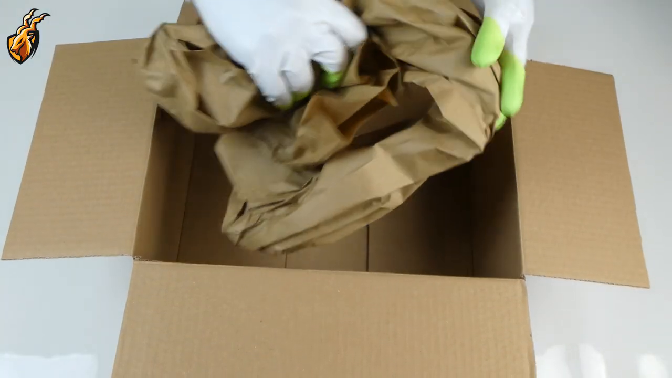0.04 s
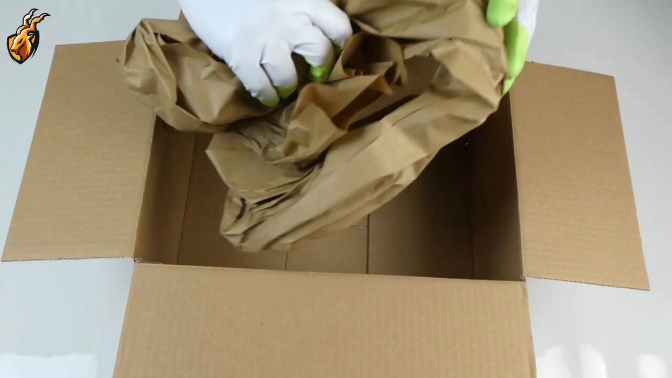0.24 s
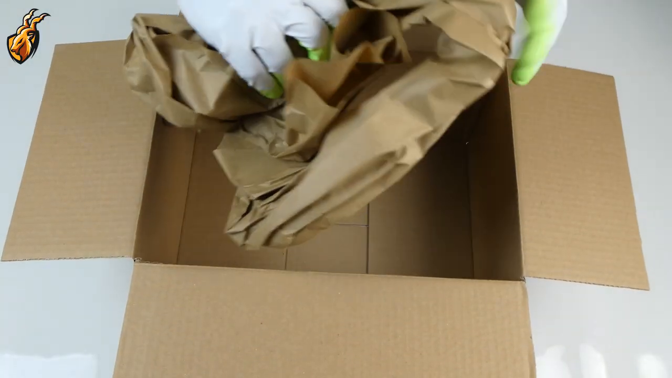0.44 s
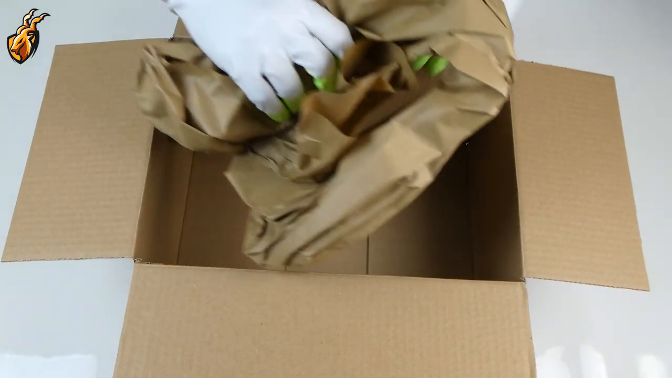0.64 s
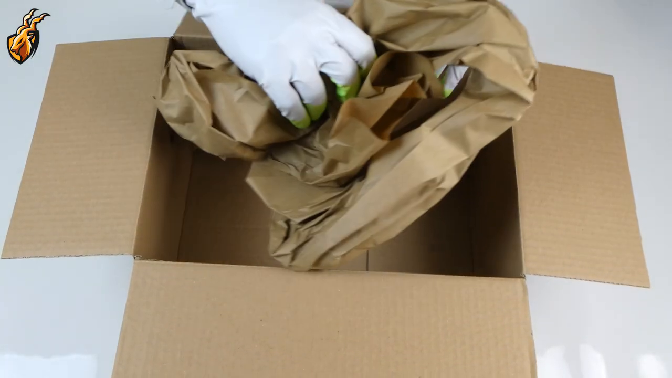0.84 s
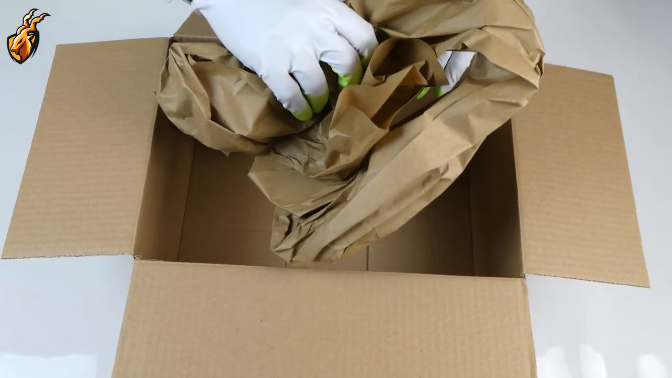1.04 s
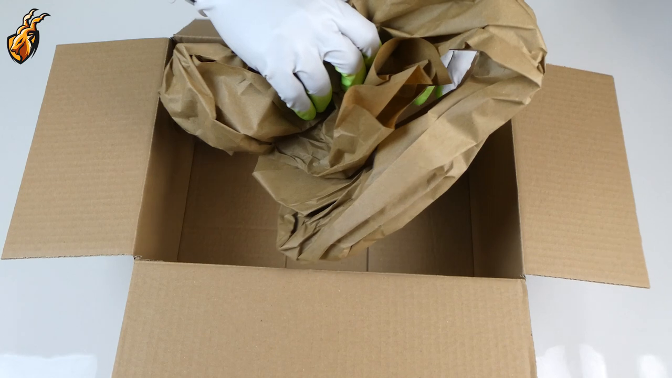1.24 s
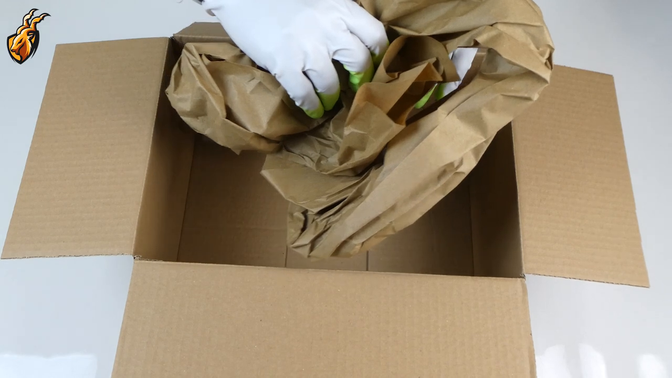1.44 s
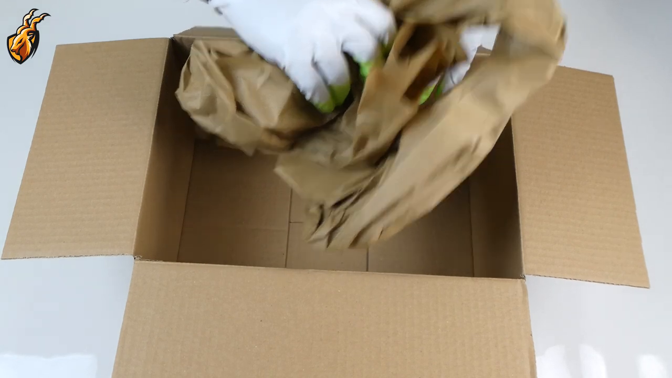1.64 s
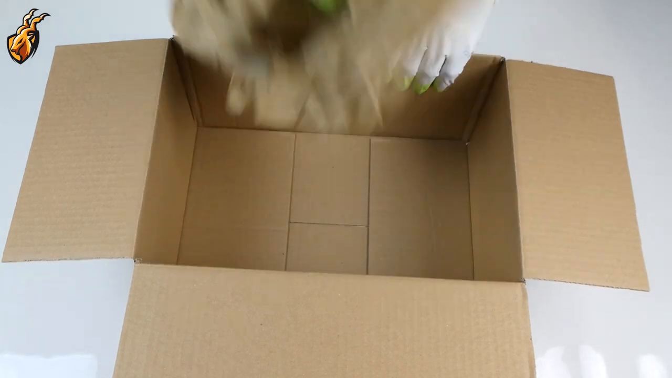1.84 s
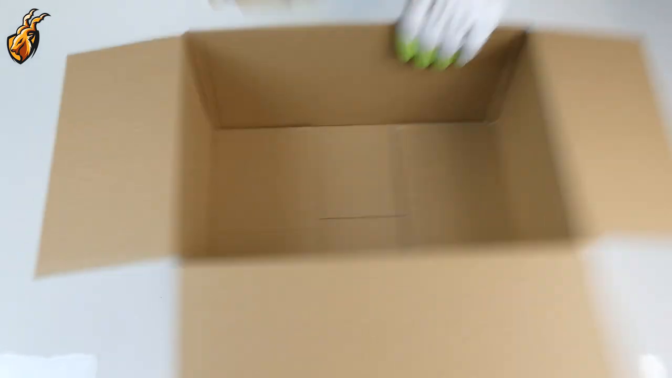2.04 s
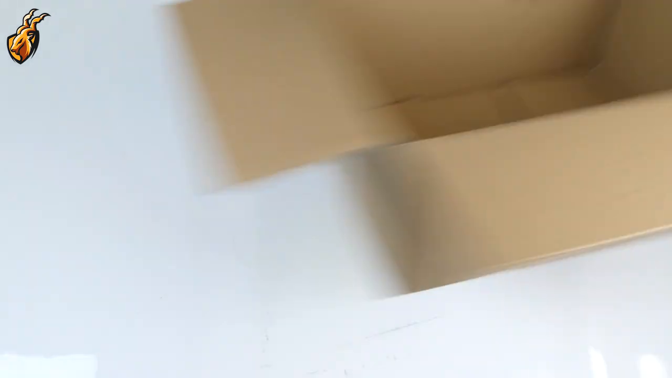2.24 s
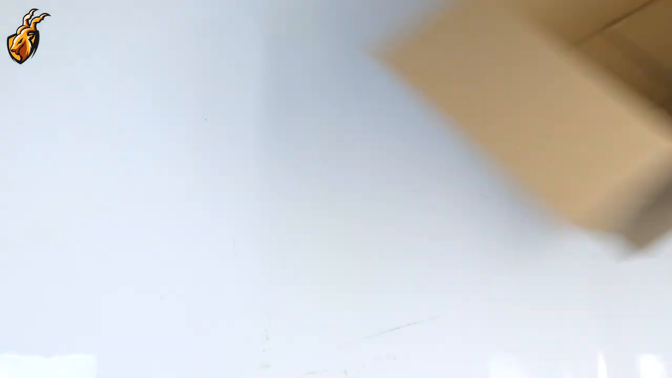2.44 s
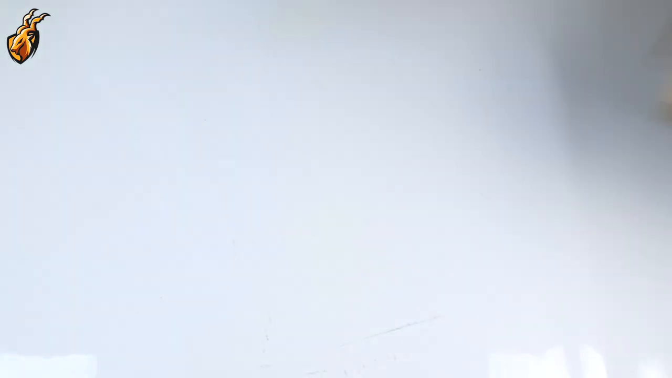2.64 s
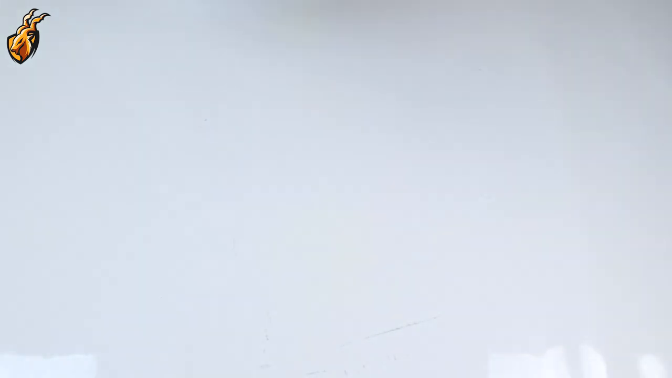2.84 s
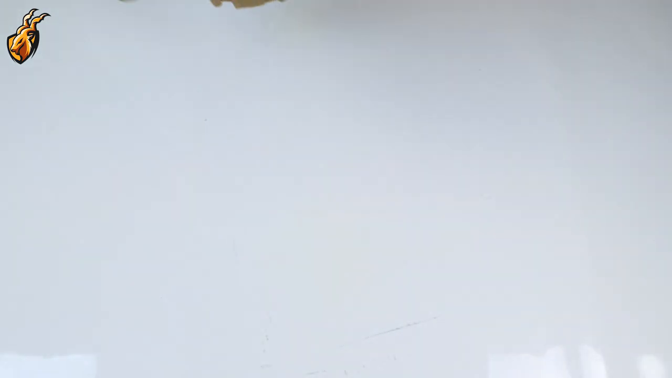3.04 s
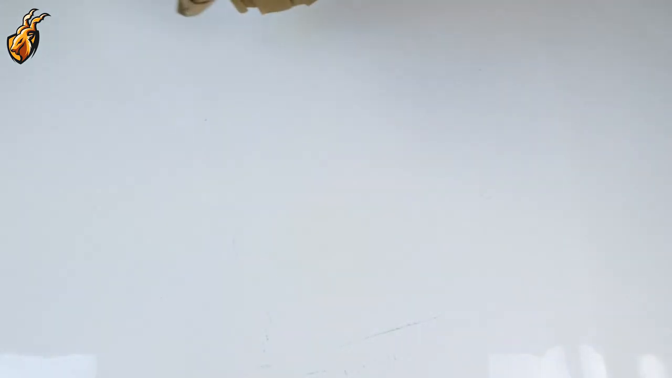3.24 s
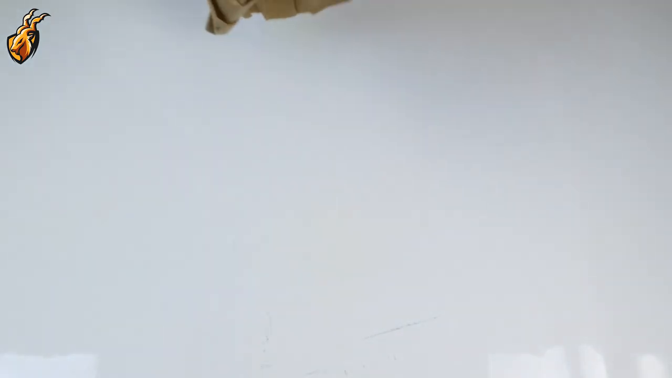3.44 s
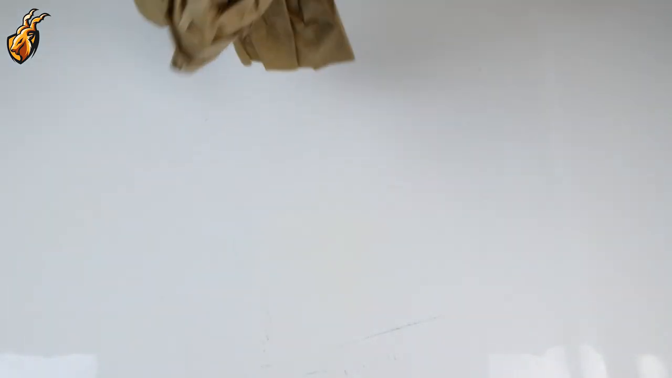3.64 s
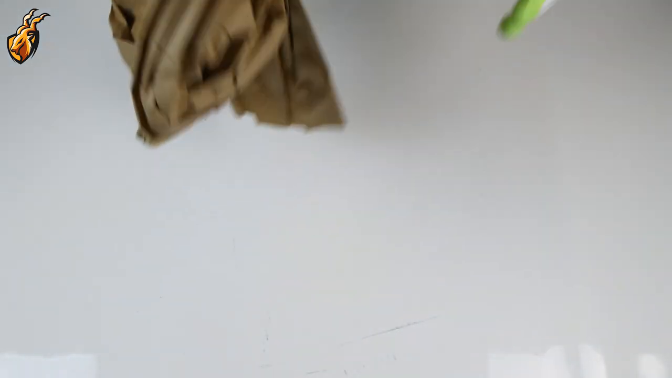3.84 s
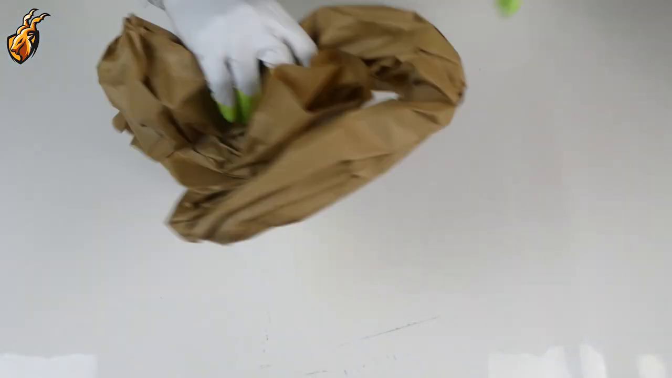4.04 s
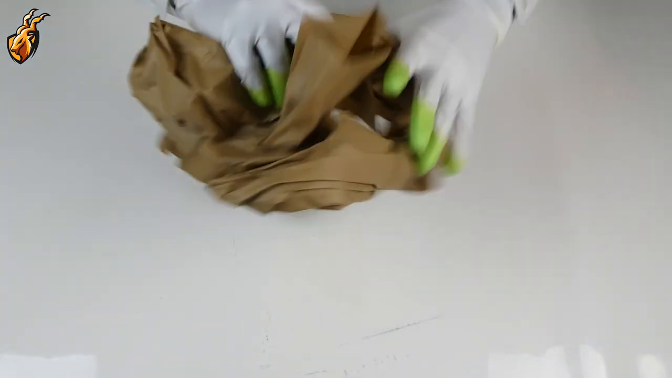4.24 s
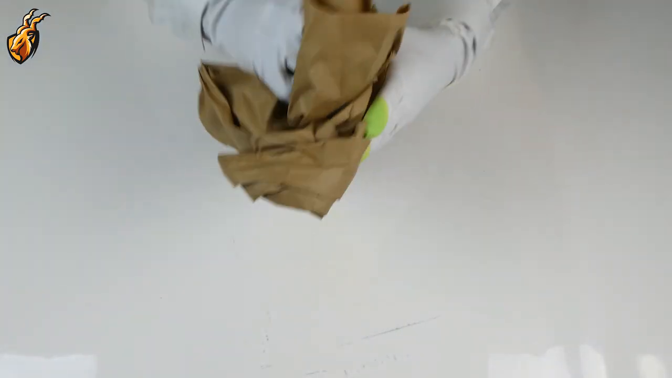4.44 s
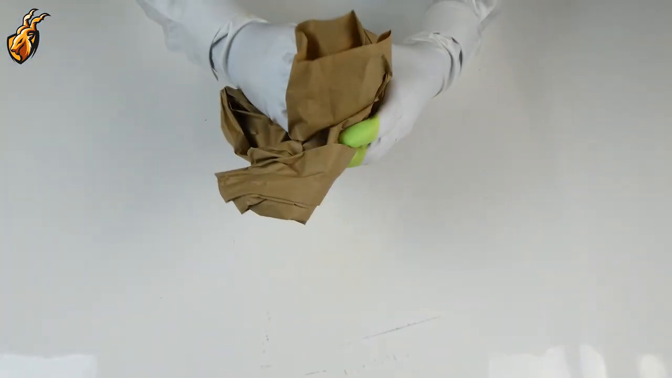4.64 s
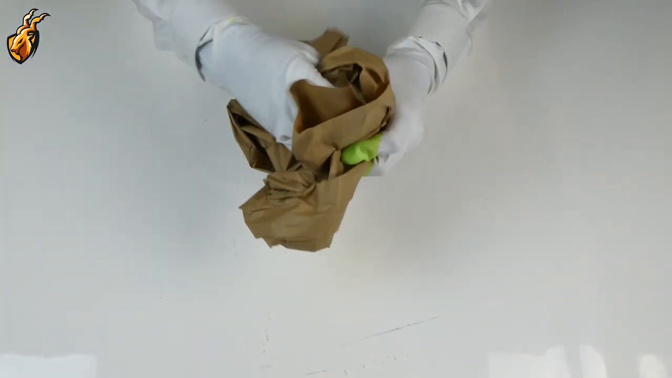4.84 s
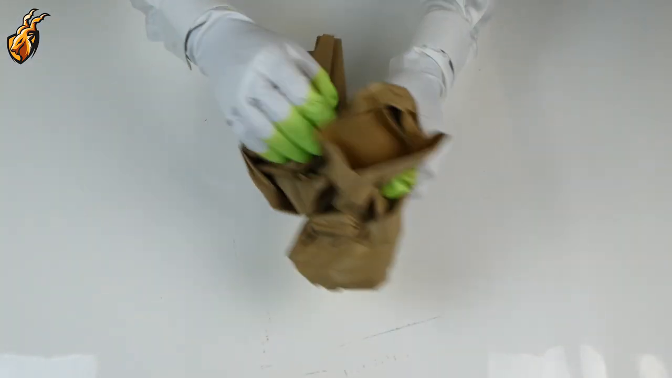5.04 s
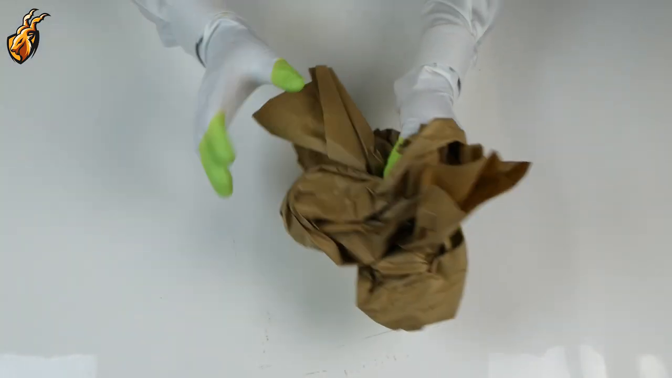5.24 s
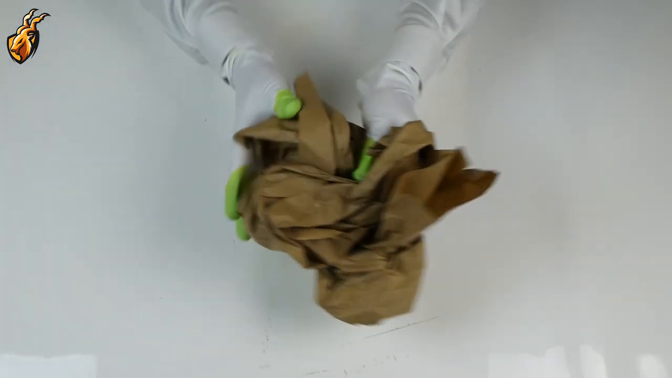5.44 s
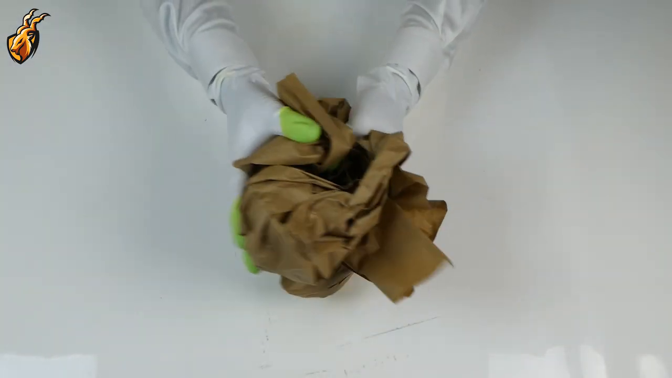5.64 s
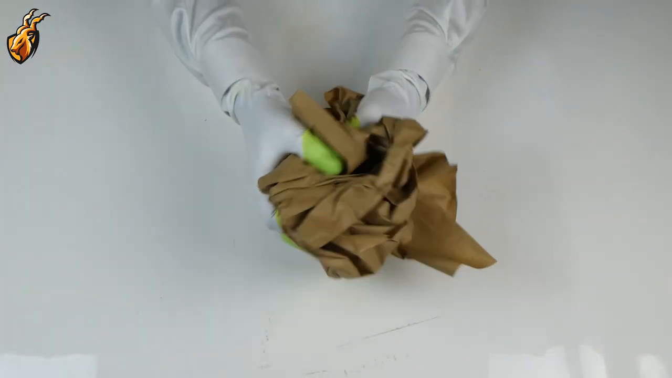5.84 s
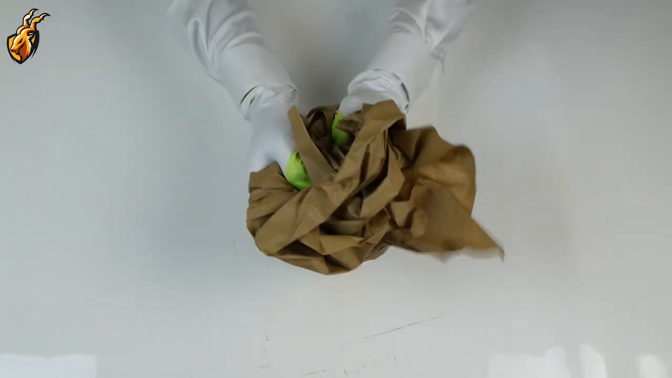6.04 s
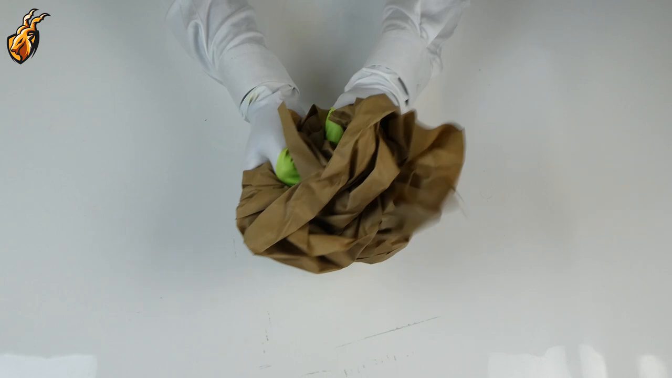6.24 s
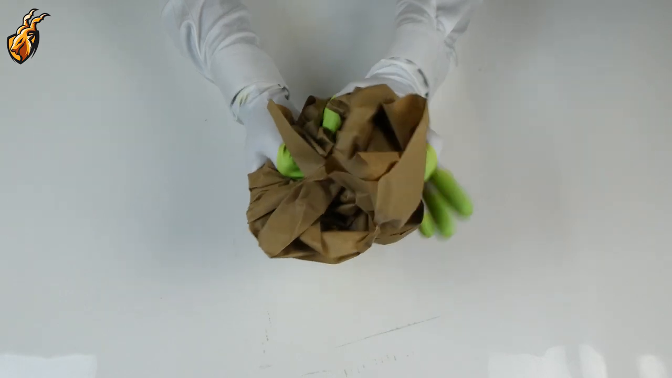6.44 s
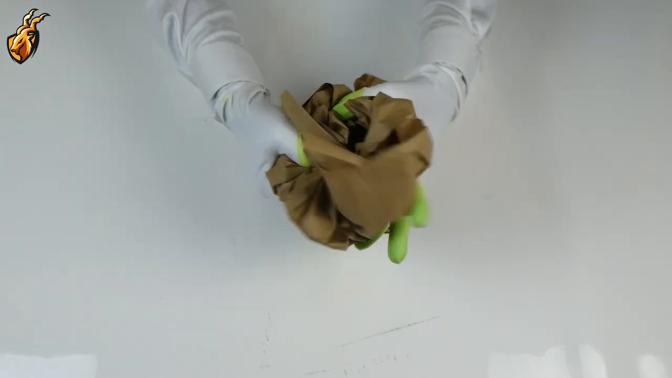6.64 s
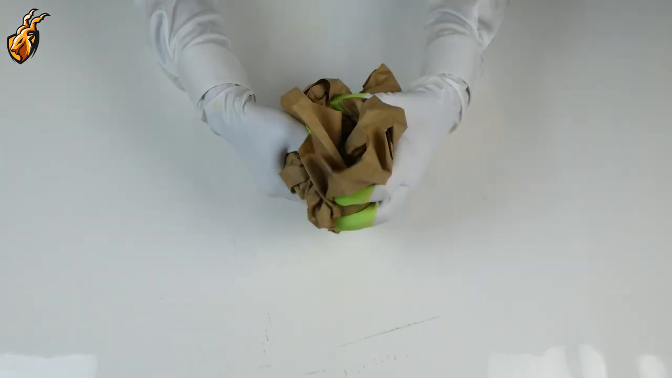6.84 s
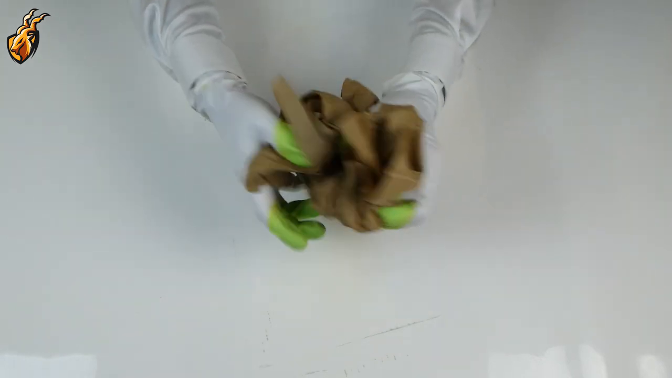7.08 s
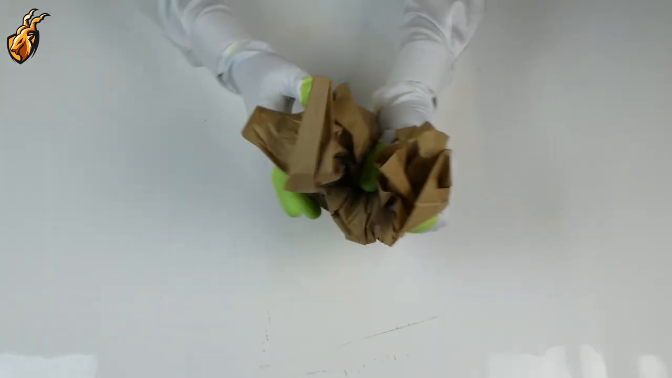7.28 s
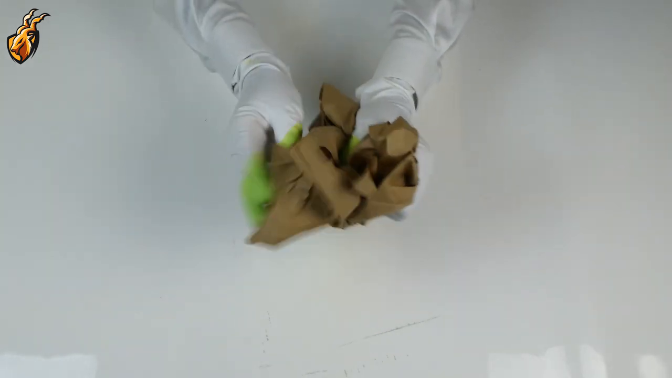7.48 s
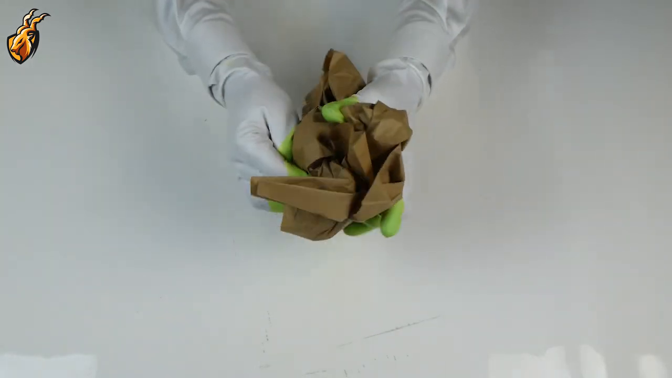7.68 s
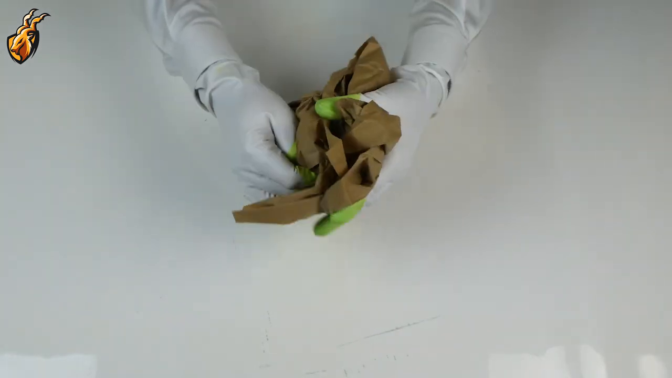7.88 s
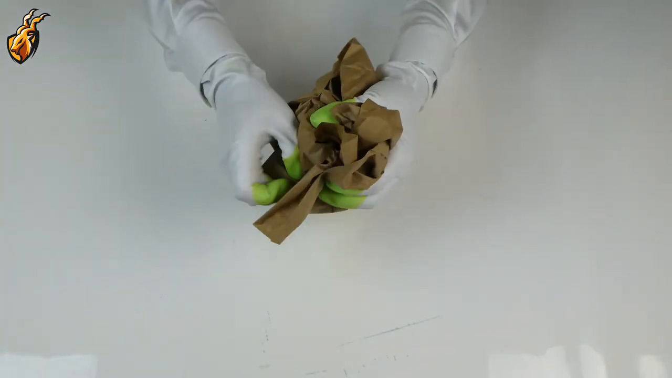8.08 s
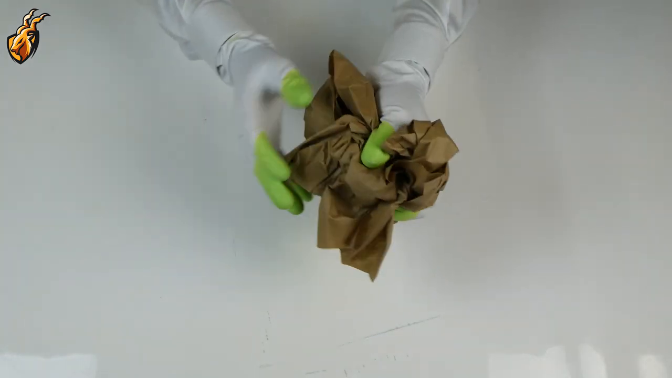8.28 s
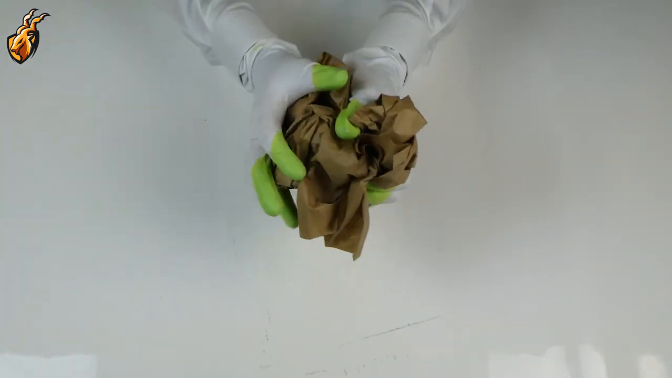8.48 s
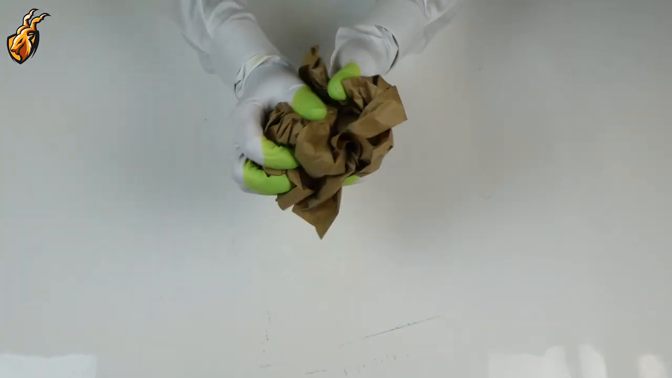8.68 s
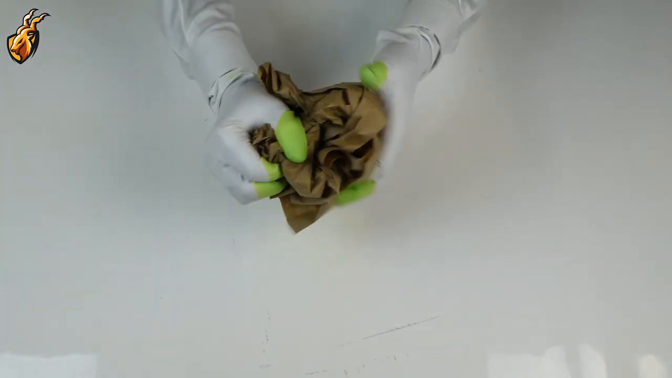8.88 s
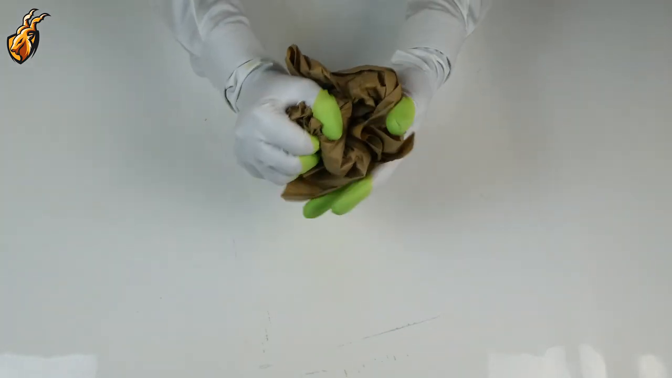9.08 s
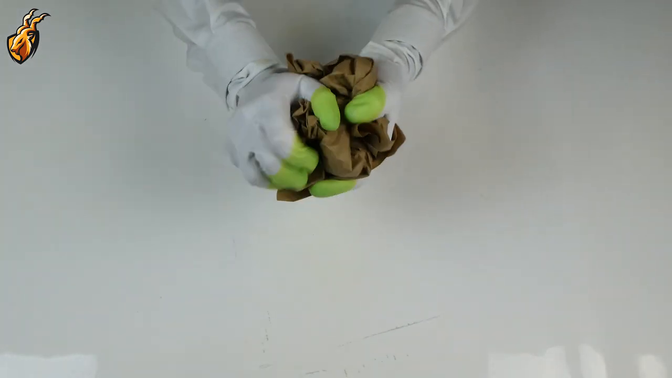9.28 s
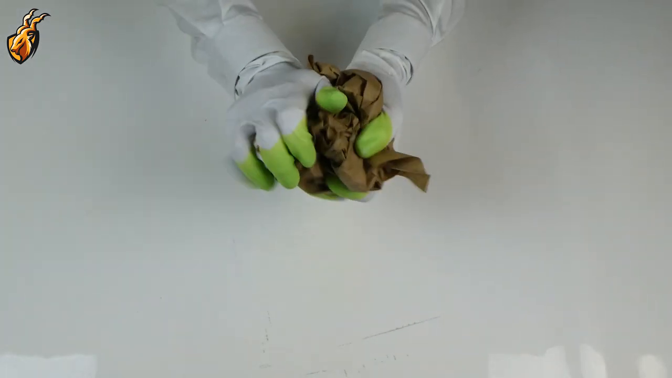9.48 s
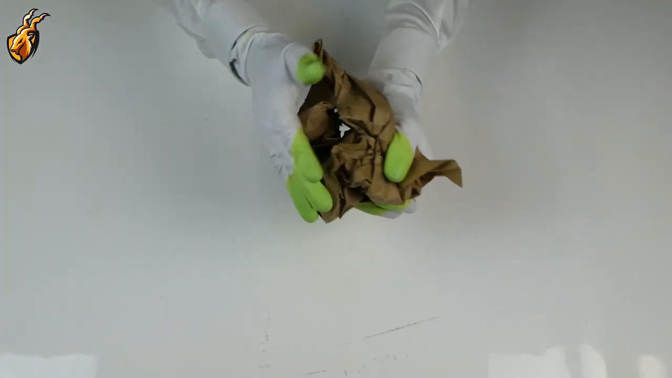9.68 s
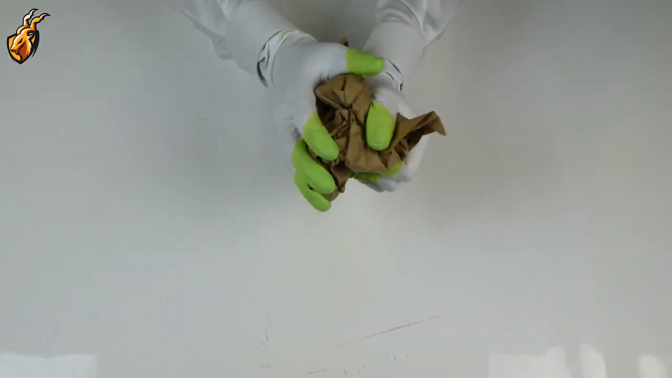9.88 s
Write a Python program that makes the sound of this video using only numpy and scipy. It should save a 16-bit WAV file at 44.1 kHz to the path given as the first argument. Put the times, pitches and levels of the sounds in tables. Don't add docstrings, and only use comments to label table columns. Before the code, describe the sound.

Close in a small quiet room, a stiff paper sheet slides out of a cardboard box with gritty rustles, small ticks and a hollow boxy ring. The box is moved away with faint bumps and near silence. Then gloved hands grab the sheet and crush it in rapid squeezes, loud crackles, sharp snaps and crunchy folds running to the end. A small bright microphone sounds crisp and slightly limited.

```python
import sys
import numpy as np
from scipy import signal
from scipy.fft import rfft, irfft, next_fast_len
from scipy.io import wavfile
from scipy.ndimage import uniform_filter1d, minimum_filter1d, map_coordinates

SR = 44100
rng = np.random.default_rng(int(sys.argv[2]) if len(sys.argv) > 2 else 0)


def log_audio(samples):
    frames = np.atleast_2d(samples).T
    limited = np.clip(frames, -1, 1)
    pcm = np.round(limited * 32767).astype(np.int16)
    wavfile.write(sys.argv[1], SR, pcm)


def volts(x):
    e = np.asarray(x, float) / 20
    return 10 ** e


N = 437472
CRUSH_S = 4.186


def unit(x):
    return x / np.sqrt(np.mean(x ** 2) + 1e-20)


def along(points, hz):
    f, v = np.transpose(points)
    return np.interp(np.log(hz + 1), np.log(f + 1), v)


def wobble(rate):
    knots = rng.standard_normal(int(N * rate / SR) + 4)
    return map_coordinates(knots, [np.arange(N) * rate / SR])


def filtered(x, response):
    m = next_fast_len(N + 8192)
    return irfft(rfft(x, m) * response(np.fft.rfftfreq(m, 1 / SR)), m)[:N]


def coloured_noise(spectrum):
    return unit(filtered(rng.standard_normal(N), lambda hz: volts(along(spectrum, hz))))


def strokes(s, held_s, db, rise_db_s, fade_db_s):
    t = np.arange(0, N / SR, .001)[:, None]
    early, late = np.maximum(s - t, 0), np.maximum(t - s - held_s, 0)
    each = db - rise_db_s * early - fade_db_s * late
    total = 10 * np.log10(np.sum(volts(2 * each), axis=1) + 1e-15)
    return np.interp(np.arange(N) / SR, t[:, 0], total)


def clicks(s, gain, hz, cycles, size):
    n = np.arange(size)
    turns = hz[:, None] * n / SR
    wave = gain[:, None] * np.sin(2 * np.pi * turns) * np.exp(-turns / cycles)
    at = (s * SR).astype(int)[:, None] + n
    return np.bincount(at.ravel(), wave.ravel(), N + size + SR)[:N]


def grains(count, hz, octaves, cycles, spread_db, clump_db, size):
    burst = rng.integers(count // 4, size=count)
    start = rng.random(count) * N / SR
    colour, force = rng.standard_normal(count), rng.standard_normal(count)
    when = np.minimum(start[burst] + .0015 * rng.exponential(size=count), (N - 1) / SR)
    shift = 0.55 * colour[burst] + 0.75 * rng.standard_normal(count)
    pitch = np.clip(hz * 2 ** (octaves * shift), 420, 17000)
    size_db = spread_db * np.minimum(rng.exponential(size=count), 3.5)
    way = rng.choice([-1, 1], count)
    clumps_db = clump_db * (.4 * wobble(70)[(when * SR).astype(int)] + force[burst])
    return unit(clicks(when, way * volts(size_db + clumps_db), pitch, cycles, size))


def jerks(s, db, run_s, count):
    s, db = np.repeat(s, count), np.repeat(db, count)
    draw = rng.random((len(s), 4))
    main = np.arange(len(s)) % count == 0
    late = np.where(main, 0, draw[:, 0] - .15)
    fade_db = np.where(main, 0, -3 - 5 * draw[:, 1] - 9 * np.abs(late))
    pitch = np.where(main, 8400 * 1.7 ** draw[:, 2], 2800 * 6 ** draw[:, 2])
    way = np.sign(draw[:, 3] - .5)
    return clicks(s + run_s * late, way * volts(db + fade_db - 10.5), pitch, cycles=0.9, size=80)


# start in seconds, hold in seconds, crackle in dB,
# broad folds in dB against the crackle.
GATHER = [
    (4.19, 0.054, -30.5, -2.5),
    (4.272, 0.18, -12, -15),
    (4.5, 0.076, -15, -19.5),
    (4.63, 0.048, -17.5, -12.5),
    (4.738, 0.093, -15, -13),
    (4.937, 0.048, -12.5, -15),
    (5.04, 0.053, -26.5, -23),
    (5.16, 0.09, -40.5, -4),
]
# start in seconds, hold in seconds, crackle in dB,
# broad folds in dB against the crackle.
SQUEEZES = [(5.33, 0.16, -28.5, -5.5), (5.49, 0.021, -16, -19), (5.583, 0.12, -13.5, -16),
            (5.762, 0.051, -12.5, -13.5), (5.87, 0.1, -14, -13.5), (6.021, 0.1, -13, -15.5),
            (6.21, 0.072, -24, -11), (6.337, 0.13, -18, -10), (6.53, 0.066, -15, -11.5),
            (6.67, 0.05, -14.5, -15.5), (6.792, 0.038, -13, -15), (6.9, 0.17, -16.5, -18),
            (7.11, 0.049, -12.5, -17), (7.21, 0.097, -17, -20.5), (7.402, 0.021, -12.5, -26),
            (7.49, 0.1, -17.5, -26), (7.66, 0.063, -13, -15.5), (7.79, 0.13, -17.5, -13.5),
            (7.92, 0.14, -17.5, -21), (8.12, 0.077, -22.5, -20), (8.25, 0.1, -21.5, -29),
            (8.462, 0.043, -17, -11), (8.571, 0.092, -14.5, -23), (8.737, 0.14, -16.5, -16.5),
            (8.937, 0.043, -14, -27), (9.096, 0.011, -18, -12), (9.16, 0.16, -20.5, -15.5),
            (9.351, 0.04, -16.5, -16), (9.42, 0.053, -20.5, -31), (9.553, .37, -18, -13.5)]


def effort():
    s, held_s, db, folds_db = np.transpose(GATHER + SQUEEZES)
    rise_db_s, fade_db_s, linger = 271, 205, 0.85
    idle_db = -150 * (np.arange(N) < CRUSH_S * SR)
    crackle = strokes(s, held_s, db, rise_db_s, fade_db_s)
    folds = strokes(s, held_s, db + folds_db, linger * rise_db_s, linger * fade_db_s)
    return crackle + idle_db, folds + idle_db


def crush():
    crackle_db, folds_db = effort()
    fine = grains(count=14000, hz=6590, octaves=0.52, cycles=0.89, spread_db=1.0, clump_db=2.0, size=64)
    rub = volts(2.76 * wobble(60)) * rng.standard_normal(N)
    broad = grains(count=8000, hz=2100, octaves=0.74, cycles=0.95, spread_db=0.0, clump_db=-0.23, size=200)
    return volts(crackle_db - 15) * (fine + 0.64 * rub) + volts(folds_db - 7) * broad


# start in seconds, peak in dB, tightness as treble over
# body in dB.
CREASES = [(4.1888, -26.0, -6.0), (4.2145, -2.0, -4.0), (4.247, 1.0, 0.0), (4.2857, 0.0, -5.0),
           (4.3532, 0.0, 2.0), (4.373, 0.0, 8.0), (4.3997, 0.0, -4.0), (4.5041, -1.0, 9.0),
           (4.5111, -2.0, 4.0), (4.5166, 0.0, 0.0), (4.5257, -2.0, 4.0), (4.5503, -3.0, 1.0),
           (4.5625, 0.0, -1.0), (4.5675, -2.0, 15.0), (4.5951, -5.0, -6.0), (4.6083, -4.0, -1.0),
           (4.6239, -2.0, -7.0), (4.6377, -5.0, 0.0), (4.6423, 0.0, 1.0), (4.6487, -2.0, 3.0),
           (4.6565, -4.0, 4.0), (4.6725, -5.0, 4.0), (4.6828, -1.0, 0.0), (4.6887, -5.0, -2.0),
           (4.7073, -6.0, 9.0), (4.7453, -3.0, 9.0), (4.8087, 0.0, -3.0), (4.8223, -1.0, -6.0),
           (4.8337, 0.0, 1.0), (4.864, -6.0, -5.0), (4.8877, -7.0, 0.0), (4.9062, -3.0, 15.0),
           (4.9343, -1.0, -2.0), (4.9519, -1.0, -2.0), (4.9671, 0.0, -1.0), (4.9782, 0.0, -3.0),
           (4.9943, 1.0, -11.0), (5.0331, 1.0, -3.0), (5.0834, 0.0, 6.0), (5.1785, -14.0, -11.0),
           (5.2263, -20.0, -13.0), (5.2709, -20.0, -15.0), (5.3268, -11.0, -10.0), (5.3608, -7.0, 2.0),
           (5.3628, 0.0, 6.0), (5.3925, -11.0, -4.0), (5.4107, -8.0, -4.0), (5.4186, -10.0, -2.0),
           (5.4219, -10.0, 0.0), (5.4312, -6.0, 4.0), (5.4331, 1.0, 8.0), (5.4735, -5.0, 1.0),
           (5.487, -3.0, 8.0), (5.4982, -1.0, -1.0), (5.5086, -5.0, 0.0),
           (5.5129, -1.0, -4.0), (5.5386, 0.0, -1.0), (5.5678, 0.0, 8.0), (5.5718, -4.0, -1.0),
               (5.5997, -6.0, -4.0), (5.6161, 0.0, -3.0), (5.6479, 0.0, -2.0), (5.6528, -1.0, 5.0),
               (5.6902, -1.0, -1.0), (5.6995, -1.0, -4.0), (5.7032, -1.0, 0.0), (5.7089, -2.0, -4.0),
               (5.7461, -4.0, 1.0), (5.7603, -1.0, 2.0), (5.7847, -1.0, -7.0), (5.81, 0.0, 6.0),
               (5.825, -3.0, 9.0), (5.8321, -3.0, 7.0), (5.8644, -2.0, 0.0), (5.8703, -1.0, -2.0),
               (5.8837, -1.0, 0.0), (5.9114, -2.0, 5.0), (5.9586, 0.0, 1.0), (5.9651, 0.0, -1.0),
               (5.9885, -3.0, 3.0), (5.9941, -2.0, 1.0), (6.0174, 0.0, -2.0), (6.0659, -1.0, -2.0),
               (6.1108, 0.0, -4.0), (6.1298, 0.0, 0.0), (6.1477, 0.0, 3.0), (6.2142, 0.0, -6.0),
               (6.2237, -3.0, 0.0), (6.2376, -8.0, 0.0), (6.2551, -7.0, 4.0), (6.3094, -7.0, 0.0),
               (6.3412, -6.0, -12.0), (6.3561, -2.0, 6.0), (6.3933, -5.0, 0.0), (6.4501, -4.0, -13.0),
               (6.4687, 0.0, 1.0), (6.5096, -3.0, 3.0), (6.5484, -4.0, -3.0), (6.5647, 1.0, -5.0),
               (6.5927, -4.0, 9.0), (6.654, -3.0, -6.0), (6.6862, 0.0, 2.0), (6.7201, -2.0, -1.0),
               (6.7251, 0.0, -1.0), (6.7693, -3.0, 3.0), (6.8056, -2.0, 4.0), (6.82, 0.0, -1.0),
           (6.8302, -1.0, 0.0), (6.8367, -3.0, 0.0), (6.847, 0.0, 0.0), (6.8643, -6.0, -7.0),
              (6.8731, -1.0, -2.0), (6.8768, -3.0, -3.0), (6.8837, -4.0, 1.0), (6.9059, -3.0, -3.0),
              (6.9106, -1.0, 2.0), (6.9274, -3.0, 4.0), (6.9729, -2.0, 8.0), (6.9942, -2.0, -4.0),
              (7.0219, -2.0, -1.0), (7.026, -2.0, -2.0), (7.0518, 1.0, 1.0), (7.0783, 1.0, 2.0),
              (7.1268, 0.0, -4.0), (7.1403, 0.0, -3.0), (7.1532, 0.0, -9.0), (7.1671, -1.0, 5.0),
              (7.1936, -4.0, 2.0), (7.2047, -1.0, -1.0), (7.2144, -4.0, 0.0), (7.2232, -3.0, 0.0),
              (7.2438, -4.0, -5.0), (7.272, -1.0, -9.0), (7.2808, -1.0, -1.0), (7.2956, 0.0, 13.0),
              (7.3254, 0.0, 8.0), (7.4267, -1.0, 3.0), (7.4365, 0.0, 7.0), (7.4433, -4.0, -1.0),
              (7.4785, -4.0, 3.0), (7.4855, -5.0, 9.0), (7.4893, 0.0, 1.0), (7.4932, 0.0, 8.0),
              (7.5067, -2.0, -1.0), (7.5448, 0.0, -6.0), (7.5503, 0.0, -5.0), (7.5666, -3.0, -1.0),
              (7.5902, -2.0, 17.0), (7.5938, -3.0, 1.0), (7.6147, -3.0, 8.0), (7.6277, -5.0, -8.0),
              (7.6912, 0.0, 1.0), (7.7129, -2.0, -6.0), (7.7434, 0.0, -4.0), (7.7733, -5.0, 4.0),
              (7.7979, -2.0, 7.0), (7.817, 0.0, -7.0), (7.8231, -4.0, 1.0),
           (7.8326, 0.0, 2.0), (7.8689, 0.0, 9.0), (7.8846, -3.0, -2.0), (7.8907, -4.0, -7.0),
               (7.914, -3.0, -3.0), (7.9255, -3.0, -6.0), (7.9328, -1.0, -2.0), (7.9415, -1.0, -2.0),
               (7.951, 0.0, -2.0), (7.9768, -3.0, 5.0), (7.9804, -1.0, 2.0), (7.9875, -2.0, 4.0),
               (7.9909, 0.0, 1.0), (7.998, 0.0, 11.0), (8.0016, -1.0, 2.0), (8.0225, -1.0, -7.0),
               (8.0281, 0.0, 0.0), (8.0366, -1.0, 10.0), (8.0535, -5.0, -7.0), (8.0845, -3.0, -1.0),
               (8.0912, -4.0, 0.0), (8.0991, 1.0, 0.0), (8.1234, -6.0, 1.0), (8.1421, -6.0, -3.0),
               (8.1748, -6.0, -8.0), (8.1845, -2.0, 7.0), (8.2397, -5.0, 7.0), (8.248, -6.0, 4.0),
               (8.2725, -5.0, -2.0), (8.2781, -6.0, -4.0), (8.2964, -6.0, -3.0), (8.3209, 0.0, 6.0),
               (8.3431, -9.0, 1.0), (8.3894, -5.0, -6.0), (8.4031, -7.0, -6.0), (8.4473, -5.0, 4.0),
               (8.4611, 0.0, -16.0), (8.4817, 0.0, -7.0), (8.5032, 0.0, -1.0), (8.5492, -6.0, -4.0),
               (8.5622, -1.0, 4.0), (8.5747, -4.0, 3.0), (8.5867, -2.0, 1.0), (8.5959, -3.0, -5.0),
               (8.643, 0.0, 3.0), (8.6583, -4.0, -8.0), (8.6722, -1.0, -5.0), (8.7132, -3.0, -10.0),
               (8.7345, -1.0, 6.0),
           (8.7413, -3.0, -6.0), (8.7639, -2.0, -4.0), (8.7882, -2.0, 3.0), (8.7901, 0.0, 3.0),
             (8.8051, -1.0, -3.0), (8.8172, -4.0, 0.0), (8.8224, 0.0, -8.0), (8.8471, -4.0, 8.0),
             (8.8617, -2.0, -3.0), (8.8779, -1.0, 0.0), (8.8861, 1.0, -6.0), (8.8928, -4.0, 9.0),
             (8.8982, -5.0, 7.0), (8.9346, -3.0, 6.0), (8.9452, 1.0, 7.0), (9.008, -3.0, 5.0),
             (9.0361, -8.0, 2.0), (9.0378, -7.0, -3.0), (9.0929, -7.0, -17.0), (9.104, 1.0, -13.0),
             (9.1078, 1.0, -12.0), (9.1146, 1.0, 4.0), (9.1665, -3.0, -2.0), (9.1944, -3.0, 0.0),
             (9.2157, -1.0, 10.0), (9.2213, -5.0, 0.0), (9.2307, 0.0, 5.0), (9.2535, -7.0, 11.0),
             (9.272, -1.0, 0.0), (9.2864, -1.0, 14.0), (9.3748, -1.0, 18.0), (9.3861, -3.0, -1.0),
             (9.4228, -3.0, -12.0), (9.445, -1.0, 13.0), (9.4611, -7.0, -6.0), (9.4758, -5.0, -5.0),
             (9.5397, -2.0, 17.0), (9.5484, 0.0, 9.0), (9.6015, -4.0, 1.0), (9.6354, 0.0, 10.0),
             (9.7138, -3.0, 5.0), (9.7183, -4.0, -9.0), (9.7514, -3.0, 1.0), (9.7589, -1.0, 1.0),
             (9.7744, -3.0, 3.0), (9.7859, -3.0, -1.0), (9.7915, -3.0, 7.0), (9.8137, -4.0, 5.0),
             (9.8353, -4.0, -7.0), (9.8738, -6.0, 3.0), (9.8985, -5.0, 8.0), (9.9135, -4.0, -18.0)]


def sharp_creases():
    s, db, tight_db = np.transpose(CREASES)
    draw = rng.random((len(s), 4))
    way, db = np.sign(draw[:, 0] - .5), db - 13
    edge_db, fold_db = db - 5.5 + 0.62 * tight_db, db - 3 - .6 * tight_db
    crack = clicks(s, way * volts(db), 8200 * 1.25 ** draw[:, 3], cycles=1.8, size=80)
    edge = clicks(s, way * volts(edge_db), 12000 * 1.13 ** draw[:, 1], cycles=1.7, size=80)
    fold = clicks(s, way * volts(fold_db), 3000 * 2.2 ** draw[:, 2], cycles=1.0, size=160)
    return crack + edge + fold + jerks(s + .0007, db + 5, run_s=.003, count=7)


def stray_creases(count):
    draw = rng.random((count, 2))
    s = CRUSH_S + (N / SR - CRUSH_S) * draw[:, 0]
    press_db = effort()[0][(s * SR).astype(int)] + 15
    spread_db = 4 * (2 * draw[:, 1] - 1)
    return jerks(s, -19 + 0.76 * press_db + spread_db, run_s=0.0013, count=6)


# start in seconds, peak in dB, pitch in Hz.
POPS = [(4.2132, -4, 3200), (4.382, -11, 3260), (4.8225, -11, 3000), (4.934, -10, 2970), (5.133, -24, 2760),
        (5.1778, -18.5, 1860), (5.2258, -19, 3500), (5.257, -23, 3420), (5.3095, -30, 1210),
        (5.379, -24, 2800), (5.3865, -20, 1800), (5.4005, -14.5, 2400), (5.4106, -8, 6600),
        (5.433, -1, 5850), (5.925, -12, 3900), (6.215, -8.5, 4500), (6.3572, -5, 2850), (6.705, -5, 5080),
        (6.9915, -3, 5700), (7.109, -10, 2920), (7.273, -2.5, 4080), (7.626, -14, 1590), (8.0385, -8, 5770),
        (8.4476, -20, 1770), (8.461, -6, 2120), (8.503, -16, 3300), (8.5468, -10.5, 2070),
        (8.673, -10, 3220), (8.7464, -8, 5080), (8.8234, -5, 3480), (8.8529, -11, 2670),
        (8.933, -14.5, 1070), (9.5593, -17, 1380), (9.6573, -6, 3660), (9.835, -12, 3410)]


def panels():
    s, db, hz = np.transpose(POPS)
    return clicks(s, volts(db - 4), hz, cycles=1.6, size=300)


# start in seconds, peak in dB, body in dB against the peak.
TICKS = [(0.0074, -14, -8), (0.029, -16, -1), (0.1122, -12.5, -16), (0.175, -11.5, -29),
         (0.2425, -17.5, -11), (0.474, -23, -28), (0.494, -17.5, -17), (0.804, -20.5, -9),
         (0.821, -24, -14), (0.878, -16, -8.5), (1.337, -48, -9), (1.5007, -25.5, -12), (1.826, -47, 1),
         (1.9057, -46, -23), (1.9255, -51, -24), (1.948, -30.5, -28), (1.9694, -33.5, -26),
         (2.041, -47, -28), (2.1101, -51, -21), (2.512, -41.5, -19), (2.5625, -31, -6),
         (3.0957, -26.5, -17), (3.239, -34, -11), (3.8706, -52, -8), (3.925, -47, -20)]


def sheet_ticks():
    s, db, body_db = np.transpose(TICKS)
    pitch = 1200 * 2.0 ** rng.random(len(s))
    knock = clicks(s, volts(db + body_db + 5), pitch, cycles=0.81, size=300)
    return jerks(s + .0009, db + 9.5, run_s=.007, count=16) + knock


# start in seconds, hold in seconds, rub in dB,
# body in dB against the rub.
SLIDES = [
    (0.0, 0.14, -24.5, -11),
    (0.33, 0.12, -38.5, -5.5),
    (0.549, 0.17, -32, -13.5),
    (0.909, 0.044, -38.5, -14.5),
    (1.68, 0.13, -53, -10.5),
    (3.235, 0.074, -57, -3),
    (3.93, 0.034, -58.5, -7),
    (4.01, 0.013, -53, -4.5),
]
# start in seconds, rub in dB,
# fade in dB per second, body in dB against the rub.
JOLTS = [(0.299, -53.5, 302, 12), (0.964, -57, 222, -7), (1.166, -60.5, 202, -3), (1.225, -62.5, 95, -5),
         (1.315, -58.5, 248, -7), (1.379, -55.5, 328.5, -5), (1.503, -45.5, 118.5, -12),
         (1.83, -64, 200, 10.5), (1.91, -56, 300, -18), (1.948, -46, 300, -5), (2.03, -66.5, 23, -11),
         (2.563, -57, 215, -0.5), (2.62, -72, 44, -8), (2.985, -69, 32, -4), (3.025, -54.5, 200, -14.5),
         (3.097, -58, 222, -18), (3.2, -49, 54, -20), (3.322, -35.5, 129, -5.5), (3.425, -41, 186, 6),
         (3.53, -58.5, 68, 3.5), (3.9, -66, 11, -7)]
# start in seconds, hold
# in seconds, thud in dB, fade in dB per second.
BUMPS = [(0.0, 0.018, -50, 150), (0.08, 0.05, -52, 200), (0.22, 0.053, -57, 203), (0.3, .4, -70, 100),
         (0.804, 0.034, -46.5, 170), (1.2, 0.072, -69.5, 96), (1.51, 0.09, -71, 40),
         (1.84, 0.011, -57, 200), (1.973, 0.0056, -50, 302), (2.655, .01, -72.5, 401),
         (3.239, .01, -46.5, 90), (3.381, 0.066, -43, 180), (3.6, 0.011, -69, 87), (4.0, .02, -74, 200),
         (4.33, 0.031, -46, 300), (5.46, 0.03, -49, 300)]
# frequency in Hz, level in dB per Hz.
SHEET = [(30, -30), (200, -1), (400, 2.5), (1000, 4), (3000, -1), (8000, -13), (16000, -31.5)]
THUD = [(30, -15.5), (70, -12), (110, -12.5), (145, -9), (185, -12.5), (260, -17), (800, -40)]


def handling():
    s, held_s, slide_db, slide_body = np.transpose(SLIDES)
    at, jolt_db, jolt_fade, jolt_body = np.transpose(JOLTS)
    *bump, bump_fade = np.transpose(BUMPS)

    def moved(slide_level, jolt_level):
        slide = volts(strokes(s, held_s, slide_level, rise_db_s=198, fade_db_s=166.5))
        return np.hypot(slide, volts(strokes(at, 0, jolt_level, rise_db_s=2500, fade_db_s=jolt_fade)))

    grit = grains(count=60000, hz=7760, octaves=0.42, cycles=0.24, spread_db=2.0, clump_db=1.5, size=24)
    body = volts(3.2 * wobble(36)) * coloured_noise(SHEET)
    thud_db = strokes(*bump, 2005.5, bump_fade) + 3.3 * wobble(23.05)
    thud = volts(thud_db) * coloured_noise(THUD)
    body_moved = moved(slide_db + slide_body, jolt_db + jolt_body)
    return volts(-11.5) * moved(slide_db, jolt_db) * grit, volts(-4.5) * body_moved * body + thud


def resonance(f, hz, width_hz):
    return 1j * f * width_hz / (hz * hz - f * f + 1j * f * width_hz)


# frequency in Hz, width in Hz, level in dB.
BOX = [
    (150, 6, -4.5),
    (420, 83, 3),
    (762, 17, -5),
    (964, 71, 2.5),
    (1770, 81, -19),
]


def box(x):
    def hollow(f):
        return sum((-1) ** k * volts(db) * resonance(f, hz, width) for k, (hz, width, db) in enumerate(BOX))

    gone_s = 2.3
    return filtered(x * (np.arange(N) < gone_s * SR), hollow)


# start in seconds, hold in seconds, level in dB,
# rise in dB per second, fade in dB per second.
RIM_DRAG = (0.975, .03, -61, 400, 110)


def hum():
    hz, width_hz, _ = BOX[3]
    wall = unit(filtered(rng.standard_normal(N), lambda f: resonance(f, hz, width_hz) ** 2))
    return volts(strokes(*RIM_DRAG)) * wall


def kneading():
    since_crush_s = np.arange(N) / SR - CRUSH_S
    press_db = 0.45 * np.maximum(effort()[1], -150) - 46.5
    idle_db = -60 * (np.arange(N) < CRUSH_S * SR)
    level_db = press_db - 0.45 * since_crush_s + idle_db + 3.5 * wobble(30)
    return volts(level_db) * coloured_noise(THUD)


def radiated(x, low_hz, high_hz):
    return filtered(x, lambda f: (1j * f / (1j * f + low_hz)) ** 2 * (1 + 1j * f / high_hz))


# frequency in Hz, time to fall 60 dB in seconds.
ROOM = [(200, 0.64), (800, 0.19), (2000, 0.52), (6000, 0.25), (14000, 0.0071)]


def room(x):
    out, step = np.zeros(N + SR), SR // 5
    for start in range(0, N, step):
        hz, t, z = signal.stft(rng.standard_normal(SR // 3), SR, nperseg=256)
        decay = volts(-60 * t / along(ROOM, hz)[:, None])
        tail = signal.istft(z * decay, SR, nperseg=256)[1]
        answer = signal.fftconvolve(x[start:start + step], tail / np.linalg.norm(tail))
        out[start + 130:][:len(answer)] += answer
    return out[:N]


# frequency in Hz, level in dB per Hz.
AIR = [(30, -0.5), (200, 3), (450, -3.5), (600, -5.5), (1500, -20.5), (6000, -33.5), (16000, -14.5)]


def still_air():
    return volts(-79.5) * coloured_noise(AIR)


def scene():
    grit, board = handling()
    crackle = crush()
    snaps = sheet_ticks() + panels() + sharp_creases() + stray_creases(count=260)
    near = radiated(grit + crackle + snaps, low_hz=433, high_hz=10200) + board
    near = near + volts(8.0) * box(near)
    hands = kneading()
    air = still_air()
    return (near + hum() + hands + volts(-12.0) * room(near) + air)[None]


def top_cut(x):
    return signal.sosfilt(signal.butter(12, 16810, fs=SR, output="sos"), x)


def record(dry):
    port_hz, width_hz, lift_db, top_hz = 9150, 1150, 5, 15770

    def capsule(f):
        port = port_hz ** 2 / (port_hz ** 2 - f * f + 1j * f * width_hz)
        return port * volts(lift_db * (f / top_hz) ** 3)

    x = filtered(dry[0], capsule)
    swing = np.hypot(x, filtered(x, lambda f: -1j + 0 * f))
    gain = np.minimum(1, 1.05 / (swing + 1e-9))
    x = x * uniform_filter1d(minimum_filter1d(gain, 45), 45)
    x = filtered(x, lambda f: .5 - .5 * np.tanh((f - top_hz) / 35))
    return top_cut(x[None])


dry = scene()
out = record(dry)
log_audio(out)
```